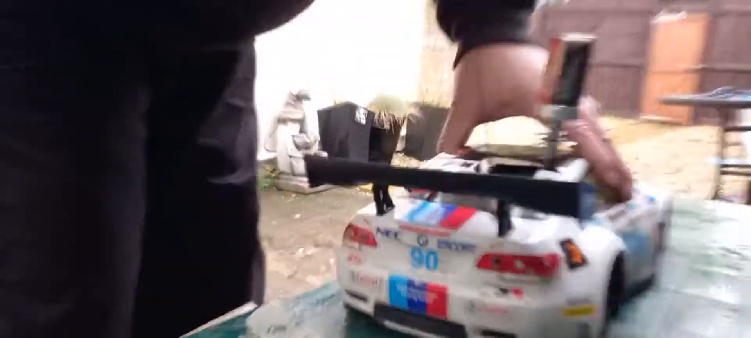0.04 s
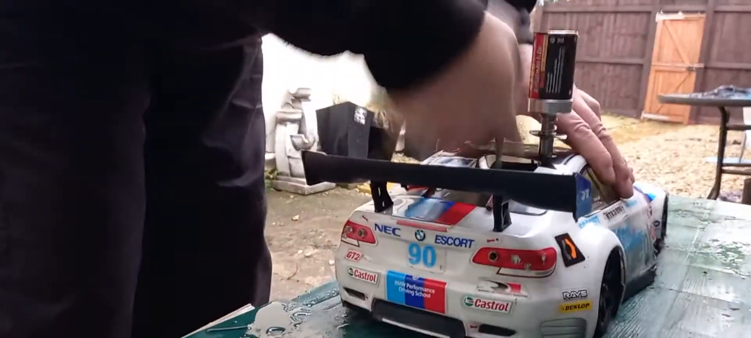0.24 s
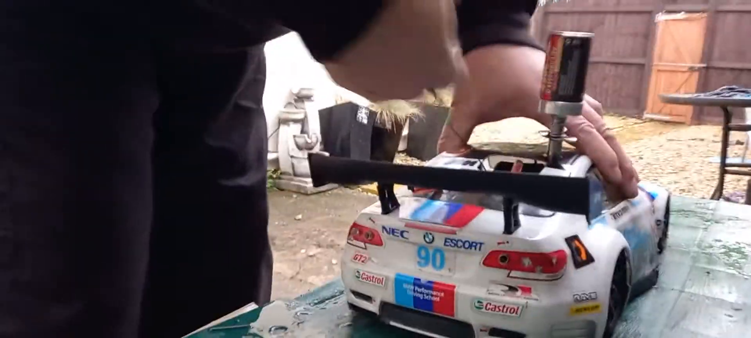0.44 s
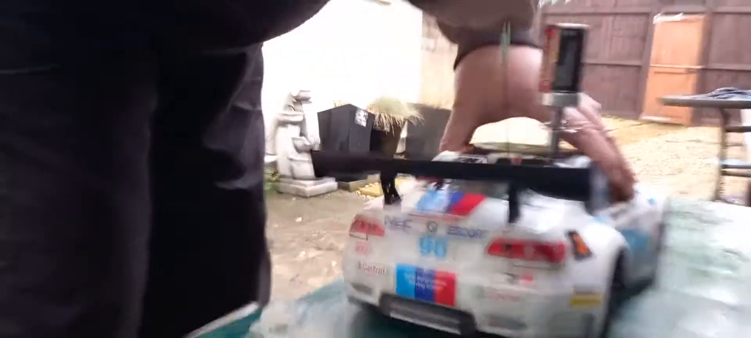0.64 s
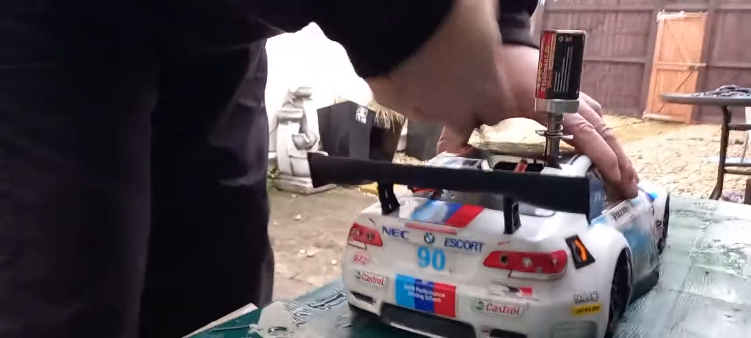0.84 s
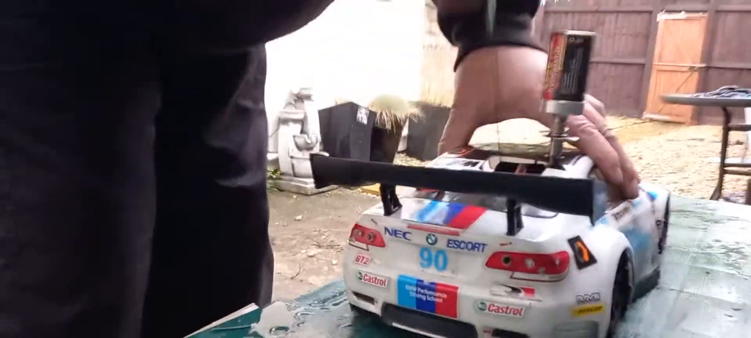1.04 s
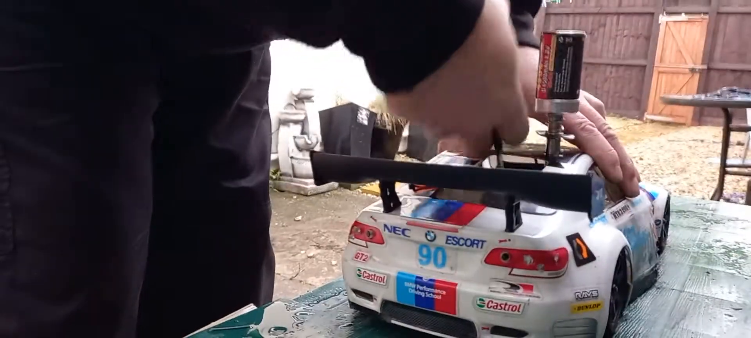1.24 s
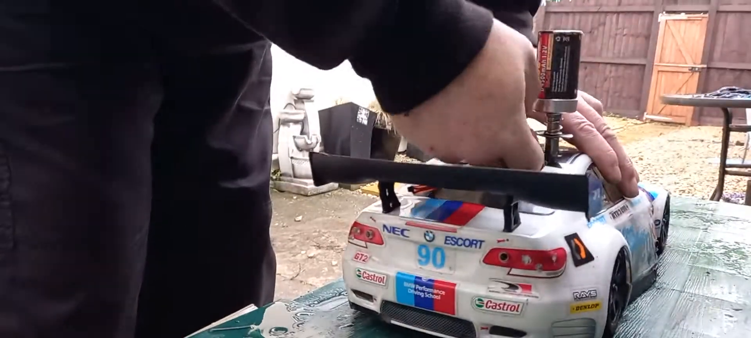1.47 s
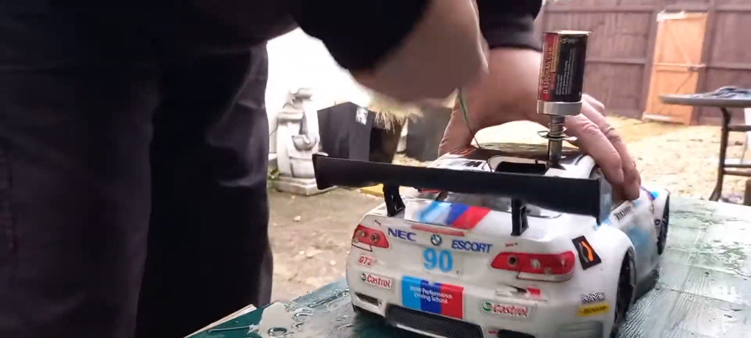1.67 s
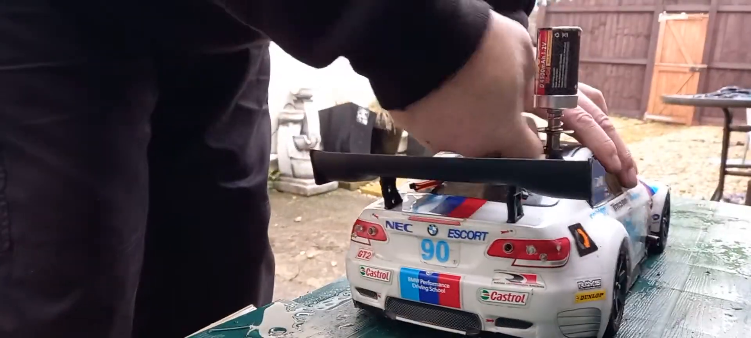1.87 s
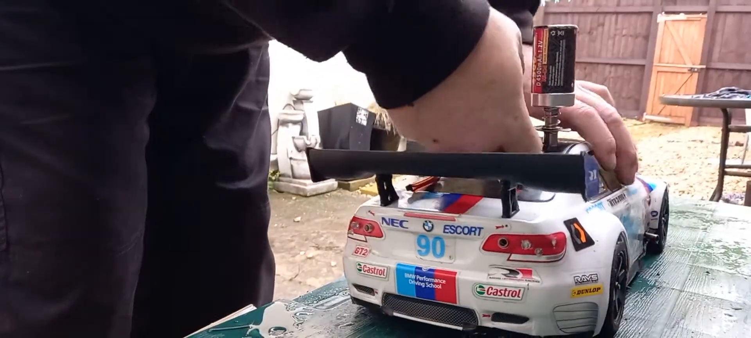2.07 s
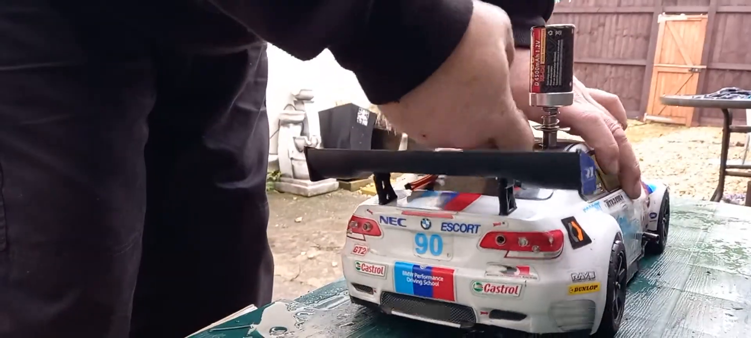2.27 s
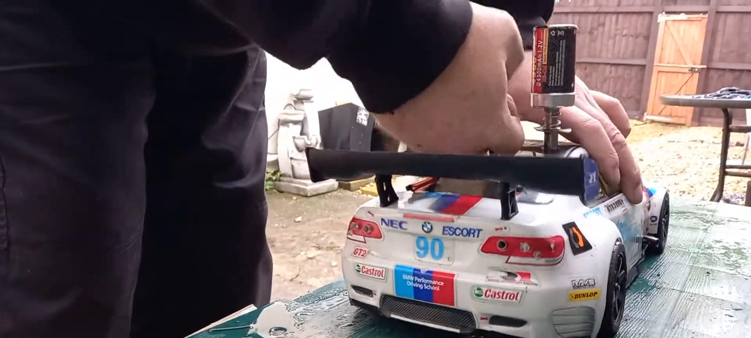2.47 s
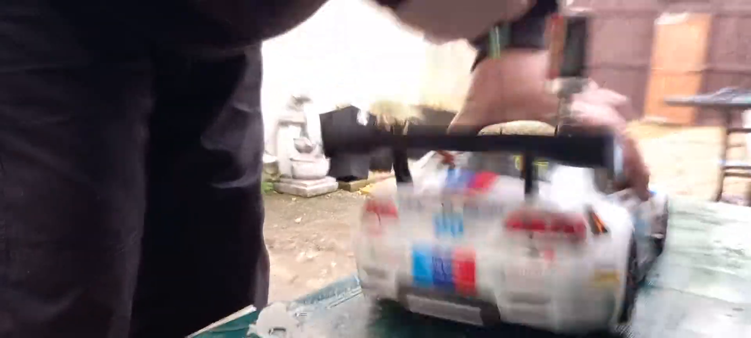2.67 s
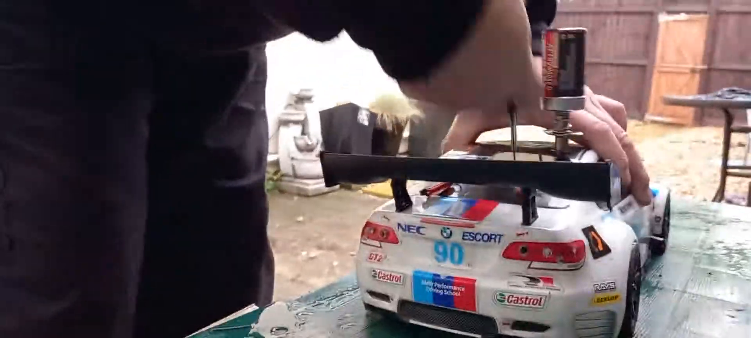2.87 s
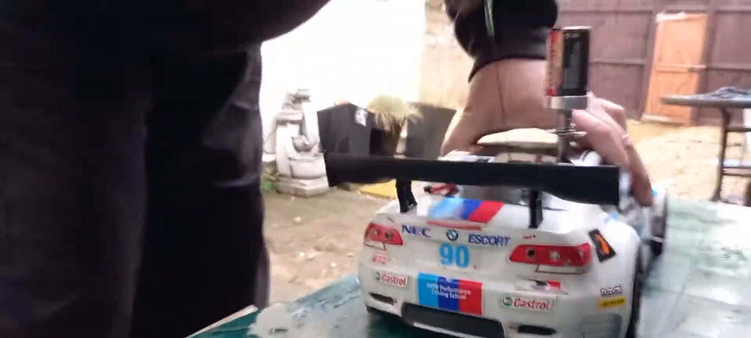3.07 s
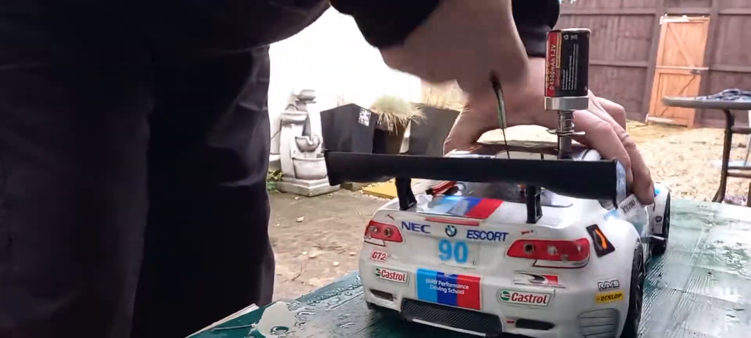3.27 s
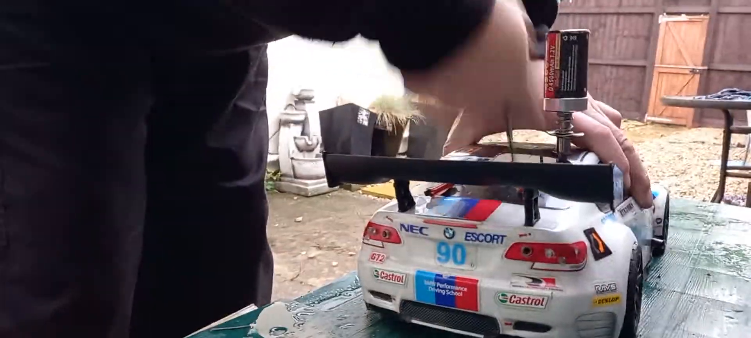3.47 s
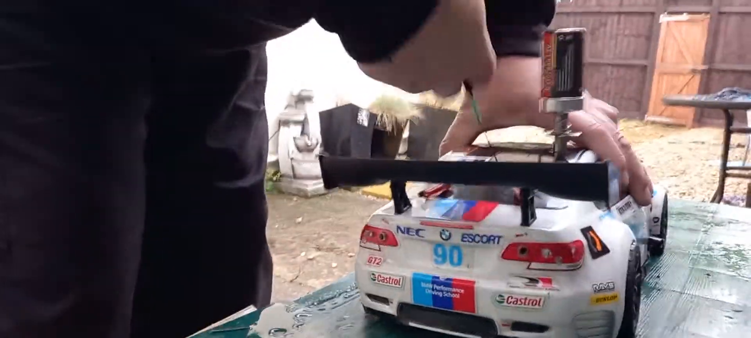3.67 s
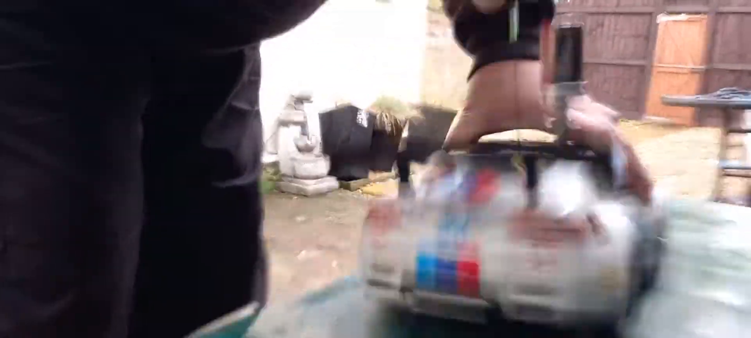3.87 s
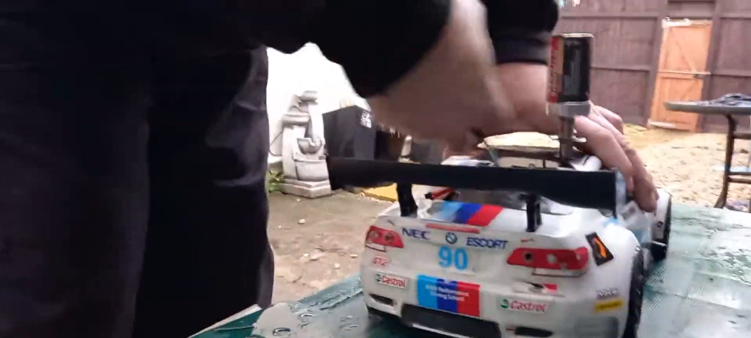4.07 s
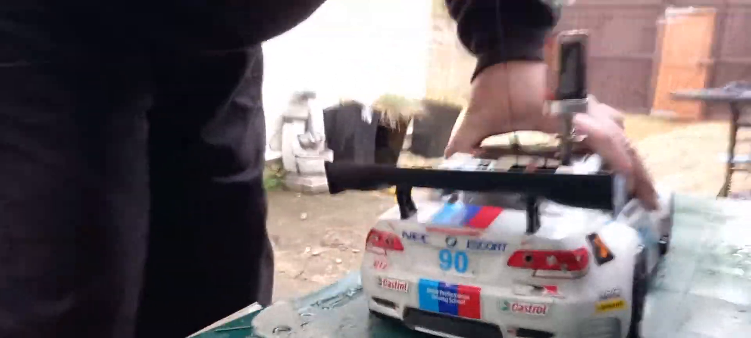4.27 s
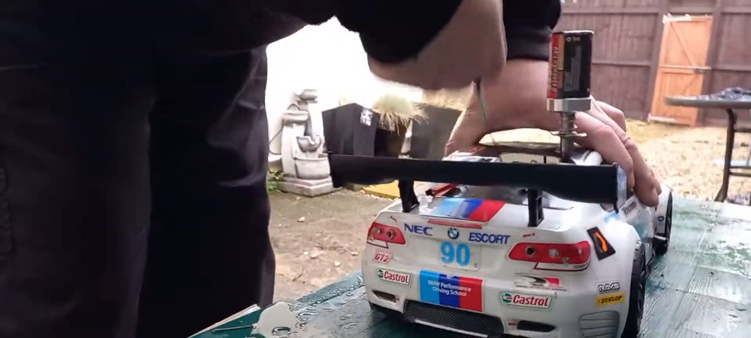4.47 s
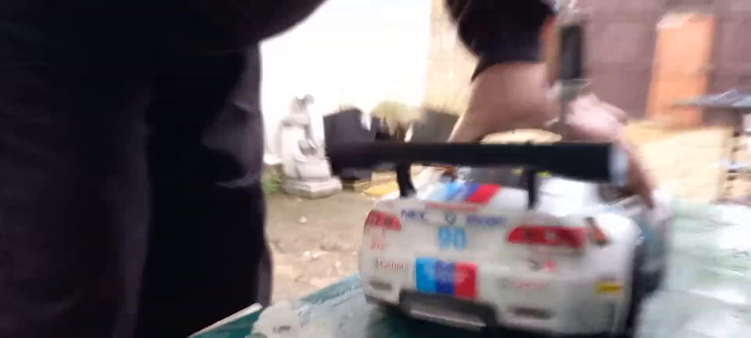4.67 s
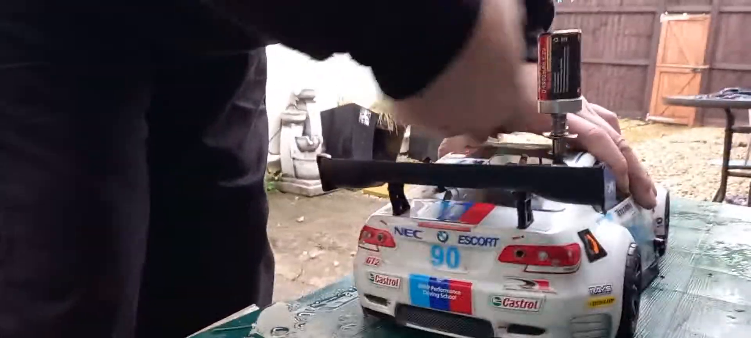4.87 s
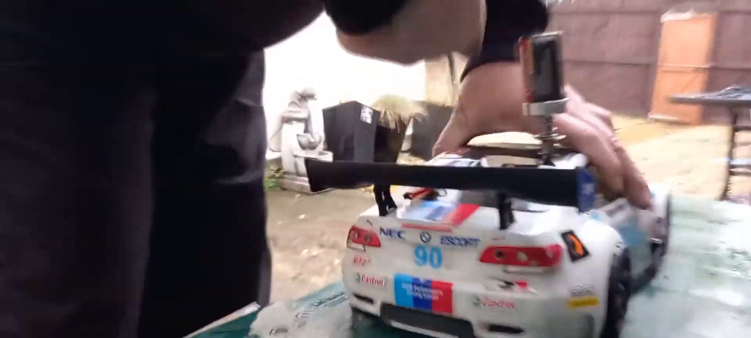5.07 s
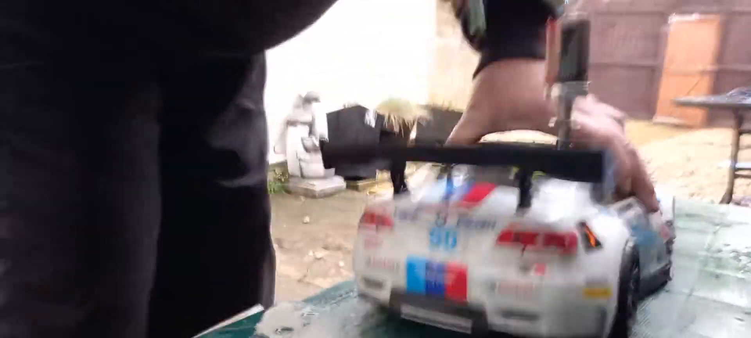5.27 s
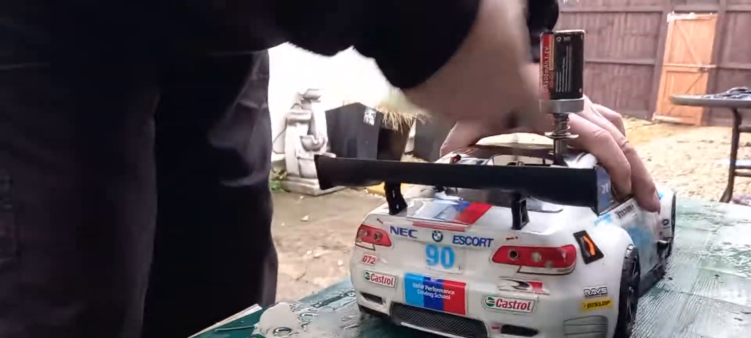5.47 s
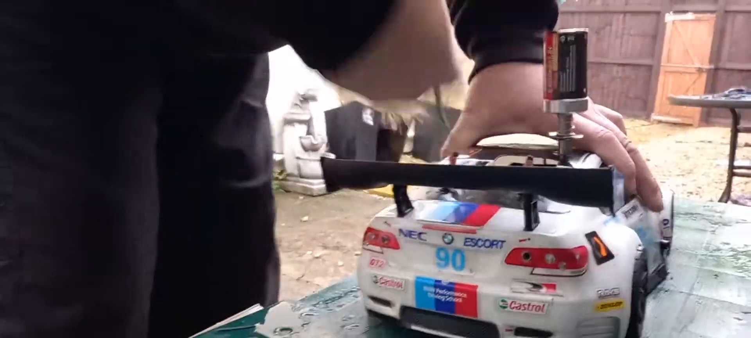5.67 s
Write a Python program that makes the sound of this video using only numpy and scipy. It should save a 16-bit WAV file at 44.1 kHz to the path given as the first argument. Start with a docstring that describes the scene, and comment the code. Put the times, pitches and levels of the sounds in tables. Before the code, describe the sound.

Repeated brisk cord pulls on a model car's little engine, each a rasp, metallic clack, thudding puffs and hollow tock, in a quiet yard.

```python
"""Starter of a model car's glow engine, close by: fourteen cord pulls, the first under way; it never runs.
Each pull snaps the cord taut and clacks the steel clutch (noise bursts, ringing modes); the piston thumps
(swinging tones), ports puff (pulsed noise), or the clutch skids and ratchets through chassis resonances.
The cord rasps out and rewinds with a sinking whirr (echoed noise); the handle tocks hollowly. Behind:
yard wash, rumble of hands, faint whine and short echoes."""
import sys
import numpy as np
from scipy import signal
from scipy.fft import irfft
from scipy.io import wavfile
from scipy.ndimage import uniform_filter1d

SR = 44100
rng = np.random.default_rng(int(sys.argv[2]) if len(sys.argv) > 2 else 0)


def wav_record(signal):
    """Record a signal, one row per channel, as 16-bit PCM in the file named by sys.argv[1]."""
    frames = np.transpose(np.atleast_2d(signal))
    bounded = np.clip(frames, -1, 1)
    # unit amplitude maps onto the largest positive 16-bit level
    quanta = np.round(bounded * 32767).astype(np.int16)
    wavfile.write(sys.argv[1], SR, quanta)


N = 251811
TIME = np.arange(N) / SR

# yard wash and rumble of hands on the car: start_s, wash_db, rumble_db
YARD_LEVELS = [(0.0, -51, -44), (1.0, -50, -40.5), (2.09, -52, -48), (2.949, -47.5, -43),
               (3.29, -58.5, -54.5), (3.91, -47, -43), (4.06, -53, -42.5), (4.59, -56.5, -41.5),
               (5.1, -49, -33), (5.55, -52, -45)]
# spectrum of distant wash: freq_hz, level_db
WASH_COLOUR = [(150, -27), (250, 6), (550, -6.5), (760, -3), (1100, -0.5), (1500, -4.5), (1900, -6),
               (3200, -17.5), (5600, -28.5), (8500, -26.5), (11000, -34), (14000, -21.5), (16000, -30.5)]
# spectrum of hand rumble: freq_hz, level_db
RUMBLE_COLOUR = [(15, -49.5), (28, -30.5), (48, -1), (80, -1), (130, -2.5), (175, -12.5), (240, -10),
                 (350, -25.5), (700, -66)]
# decay of the yard's echo: freq_hz, t60_s
ECHO_T60 = [(100, 0.7), (1000, 0.4348), (5000, 0.48), (9000, 0.46), (15000, 0.23)]
# spectrum of the yard's echo: freq_hz, level_db
ECHO_COLOUR = [(60, 4), (300, 1), (1000, 2), (4000, 1.5), (9000, 0), (15000, 1.5)]
# left-right correlation of noise: freq_hz, correlation
STEREO_LIKENESS = [(40, 0.91), (130, 0.97), (300, 0.74), (600, 0.77), (1200, 0.14), (16000, 0.042)]
# squeak while the cord is eased taut: start_s, pitch_hz, level_db
SQUEAK_PATH = [(2.3, 10000, -76.5), (2.385, 10400, -82), (2.4, 11100, -60), (2.56, 10700, -80.5)]
# spring winds the cord in: start_s, end_s, level_db
REWIND_SPANS = [(0.432, .5, -40), (.765, 0.844, -45.5), (1.652, 1.751, -39), (2.746, 2.796, -49),
                (4.016, 4.106, -46), (4.487, 4.56, -37.5), (4.793, 4.856, -37), (5.111, 5.137, -32),
                (5.367, 5.399, -36.5), (5.439, 5.463, -43.5), (5.642, 5.72, -36.5)]
# spectrum of cord rasp: freq_hz, level_db
WHIRR_COLOUR = [(300, -31), (620, -3.5), (830, 3.5), (1200, -9), (1550, -2), (2000, -8.5), (3200, -9),
                (6000, -19), (15000, -28)]
# tocks of handle and body shell: start_s, level_db
HANDLE_HITS = [(.376, -21.5), (.856, -16), (1.113, -24.5), (1.169, -35.5), (1.755, -18), (2.818, -34.5),
               (4.084, -22), (4.537, -11.5), (4.861, -28.5), (5.068, -24), (5.149, -25), (5.403, -25)]
# spectrum of handle tock: freq_hz, level_db
TOCK_COLOUR = [(150, -11), (350, -13), (550, -10), (780, 1), (950, 2), (1200, -12), (1500, -11),
               (1900, -12.5), (2500, -19), (4000, -23.5), (7000, -36), (15000, -48.5)]
# single dull chassis knocks: start_s, level_db, hollow_db (low part re knock)
KNOCK_HITS = [(.089, -30.5, 0), (0.223, -33, -1.5), (.374, -26.5, 2), (.745, -26.5, 5.5), (1.085, -34.5, 9),
              (2.927, -31.5, -6), (4.057, -30.5, -14), (5.066, -21.5, -1), (5.267, -18.5, -3),
              (5.581, -16.5, -10)]
# spectrum of dull knock: freq_hz, level_db
KNOCK_COLOUR = [(300, -13.5), (550, -2.5), (800, -4), (970, -3), (1200, -6), (1500, -13), (2200, -19),
                (3500, -23), (7000, -28), (15000, -52)]
# spectrum of hollow part: freq_hz, level_db
HOLLOW_COLOUR = [(45, -4.5), (130, 3.5), (240, -9.5), (370, -4), (520, -7.5), (700, -24), (1500, -39)]
# chassis resonances: freq_hz, width_hz, level_db
CHASSIS_MODES = [(967, 37, 17), (1418, 67, 15), (1825, 100, -0.5), (2740, 78, -12), (3306, 120, 1),
                 (3864, 87, -13), (4630, 51, -25), (5360, 97, -20.5)]
# single ticks of clutch rollers and cord guide: start_s, level_db, body_db (re treble)
TICK_HITS = [(.118, -30, -15), (.277, -29, 3), (.77, -34, -12), (1.216, -34, -12.5), (1.686, -29.5, -4),
             (2.744, -30, 1), (3.5015, -16.5, -12.5), (3.631, -27.5, -7), (3.843, -34, -19),
             (3.946, -19.5, 3), (4.022, -31.5, 2.5), (4.083, -48, 7.5), (4.3835, -25, -9),
             (4.613, -23, -5.5), (4.6435, -13, -9.5), (4.678, -16, -9), (4.7055, -20.5, 1),
             (4.776, -26.5, -24), (5.036, -20.5, 3.5), (5.098, -31, -17), (5.667, -30, -4)]
# spectrum of steel clack: freq_hz, level_db
CLACK_COLOUR = [(1180, -33), (2000, -2), (2400, -5), (3550, -4.5), (5210, -3), (6590, -9), (7570, -5),
                (8050, 0), (8330, 1), (9660, -3.5), (11900, -5), (13600, -4), (14700, -8), (15600, -12),
                (16000, -24)]
# spectrum of the clack's body: freq_hz, level_db
BODY_COLOUR = [(300, -7.5), (600, 0), (950, 0), (1200, -5.5), (1450, -4.5), (1900, 0), (2500, -8),
               (3500, -20.5), (8000, -60.5)]
# ringing modes of the steel: freq_hz, level_db, t60_s
STEEL_MODES = [(6848, -12, .65), (9168, 4, .14), (9690, 1, .15), (9986, -10, .25), (10290, -1, .2),
               (11610, -6, .16), (12990, -7, .36)]
# spectrum of port air: freq_hz, level_db
AIR_COLOUR = [(20, -18.5), (40, -1.5), (70, 11.5), (120, 0.5), (180, -4.5), (240, 0.5), (350, -3.5),
              (550, -9.5), (1000, -19), (2000, -29), (4000, -32.5), (15000, -58.5)]
# hard kicks of the piston against compression: start_s, level_db, pitch_hz
HARD_KICKS = [(0.033, -5.5, 115.6), (0.307, -11.5, 129), (.323, -8.5, 96.4), (.359, -11.5, 117),
              (.706, -12.5, 123), (2.648, -7, 127), (2.713, -4.5, 128.6), (2.7295, -11.5, 127.7),
              (2.99, -11.5, 118), (3.012, -13.5, 120.6), (3.979, -7.5, 108), (4.719, -10, 118),
              (5.046, -6.5, 123.5), (5.31, -9, 118.6), (5.609, -11.5, 115)]
# one row a pull: strike_s, clack_db, slip_s, spin_s, effort_db, steel_db, centre_hz (of ringing)
PULL_ROWS = [(-.03, -7, 0.067, 0.092, -24.5, -23, 11700), (.3006, -3, 0, 0.077, -24, -49, 9800),
             (0.6542, -7.5, 0, 0.072, -24.5, -38, 10000), (0.9426, -6.5, .063, 0.085, -27.5, -22.5, 12100),
             (1.57, -5, 0.00017, 0.065, -25, -4, 14040), (2.6443, -5.5, 0, 0.12, -25, -62, 10000),
             (2.9864, -2.5, .083, 0.11, -25, -23, 8400), (3.5351, -3, 0, 0.052, -27.5, -20.5, 11400),
             (3.879, -4, 0.0011, 0.14, -27, -57, 9900), (4.243, -4.5, .0666, 0.1, -25, -23, 11200),
             (4.654, -4.5, 0.00087, 0.066, -25, -27, 9800), (4.9558, -4, 0, 0.13, -25, -52, 10000),
             (5.239, -4.5, 0.0022, 0.094, -24.5, -47.5, 9900), (5.5593, -5, 0.00059, 0.1, -23.5, -32, 9900)]

EDGE_HZ = 15900
WHINE_HZ, WHINE_DB = 14600, -76.5
RISE_S = .0006  # steel clack
TAUT_S = .0145  # cord snaps taut this long before the strike
COAST_DB_PER_S = 428  # fade once the pull ends


def amp(db):
    """Decibels to gain."""
    return 10 ** (np.asarray(db) / 20)


def unit(x):
    """Scales to rms 1."""
    return x / np.sqrt(np.mean(x ** 2) + 1e-20)


def drift(width):
    """Slow random wander of rms 1: white noise averaged over width samples."""
    return unit(uniform_filter1d(rng.standard_normal(N), size=width))


def read(points, hz):
    """Reads a table on a log-frequency axis."""
    f, value = np.transpose(points)
    return np.interp(np.log(hz + 1), np.log(f + 1), value)


def add(mix, s, sound):
    """Adds a stereo sound at time s, which may lie before the start."""
    at = round(s * SR)
    sound = sound[:, max(-at, 0):]
    part = mix[:, max(at, 0):][:, :sound.shape[1]]
    part += sound[:, :part.shape[1]]


def level(tables):
    """Smoothed gain summed over tables of (s, dB), each at -120 dB outside its span."""
    gain = sum(amp(np.interp(TIME, *np.transpose(rows), left=-120, right=-120)) for rows in tables)
    return uniform_filter1d(gain, size=300)


def noise(colour, size=N):
    """Coloured stereo noise, its bass nearly alike in both channels."""
    hz = np.fft.rfftfreq(size, 1 / SR)
    a, b = np.exp(2j * np.pi * rng.random((2, len(hz))))
    same = np.clip(read(STEREO_LIKENESS, hz), -1, 1)
    right = same * a + np.sqrt(1 - same ** 2) * b
    return unit(irfft(np.array([a, right]) * amp(read(colour, hz)), size))


def burst(colour, rise_s, hold_s, t60_s):
    """A blow on densely ringing parts: noise that rises, holds briefly and dies."""
    t = TIME[:4096]
    decay = amp(-60 * np.maximum(t - hold_s, 0) / t60_s)
    return noise(colour, size=len(t)) * np.minimum(t / rise_s, 1) * decay


def turning(first_s, gap_s, jitter, gain_db, spread_db, count):
    """Rows (s, dB) of blows recurring unevenly in each pull, scaled by effort, fading as the crank coasts."""
    rows = []
    for s, _, _, spin_s, effort_db, _, _ in PULL_ROWS:
        early, strong = rng.standard_normal((2, count))
        after_s = first_s + gap_s * (np.arange(count) + jitter * early)
        coast_db = COAST_DB_PER_S * np.maximum(after_s - spin_s, 0)
        rows += zip(s + after_s, effort_db + gain_db + spread_db * strong - coast_db)
    return rows


def background(sway_db=1.0, waver_hz=30):
    """Distant outdoor wash, swaying rumble of hands on the car and a faint high whine."""
    s, wash_db, rumble_db = np.transpose(YARD_LEVELS)
    wash = amp(np.interp(TIME, s, wash_db)) * noise(WASH_COLOUR)
    rumble = amp(np.interp(TIME, s, rumble_db) + sway_db * drift(3000)) * noise(RUMBLE_COLOUR)
    pitch_hz = WHINE_HZ + waver_hz * drift(200)
    whine = amp(WHINE_DB) * np.sqrt(2) * np.sin(2 * np.pi * np.cumsum(pitch_hz) / SR)
    return wash + rumble + whine


def yard(x, near_db=-14, near_t60_s=0.12, far_db=-19):
    """Quick reflections from table and body, then a weak tail from walls and fences."""
    hz, t, z = signal.stft(noise(ECHO_COLOUR, size=SR // 2), SR, nperseg=256)
    decay = amp(-60 * t / read(ECHO_T60, hz)[:, None])
    far = signal.istft(z * decay, SR, nperseg=256)[1]
    t = TIME[:far.shape[1]]
    near = noise(ECHO_COLOUR, size=len(t)) * amp(-60 * t / near_t60_s) * (t > .003)
    far = far * np.minimum(t / 0.0073, 1)
    echo = amp(near_db) * near / np.linalg.norm(near[0]) + amp(far_db) * far / np.linalg.norm(far[0])
    return signal.oaconvolve(x, echo, axes=1)[:, :N]


def fiddling(per_s=11, top_db=-58, spread_db=1.5, t60_s=.025):
    """Hands shifting on the car make tiny ticks at random."""
    clicks = (rng.random(N) < per_s / SR) * amp(top_db + spread_db * rng.standard_normal(N))
    return signal.oaconvolve(clicks[None], burst(CLACK_COLOUR, RISE_S, RISE_S, t60_s), axes=1)[:, :N]


def squeak(waver_hz=70):
    """A thin, unsteady friction tone."""
    s, hz, db = np.transpose(SQUEAK_PATH)
    pitch_hz = np.interp(TIME, s, hz) + waver_hz * drift(100)
    return level([np.transpose([s, db])]) * np.sin(2 * np.pi * np.cumsum(pitch_hz) / SR)


def rewinds(gain_db=-1, grain_db=1.5, echo=0.5, swell_db=4, start_hz=1280, end_hz=880):
    """Braided cord rasps back through its guide; waves echoing along it give a sinking pitch."""
    grain = unit(amp(grain_db * drift(80)))
    rasp, out = grain * noise(WHIRR_COLOUR), np.zeros((2, N))
    for start_s, end_s, db in REWIND_SPANS:
        t = np.arange(start_s, end_s, 1 / SR)
        period_s = np.linspace(1 / start_hz, 1 / end_hz, len(t))
        sung = np.array([sum(echo ** k * np.interp(t - k * period_s, TIME, side) for k in range(4))
                         for side in rasp])
        gain = amp(db + gain_db + swell_db * np.linspace(-.5, .5, len(t)))
        add(out, start_s, gain * unit(sung) * signal.windows.tukey(len(t), .25))
    return out


def draws(top_db=-43, lead_s=0.052, swell_db=18, rasp_db=1):
    """Slack cord hisses and rasps out through its guide, swelling until the clutch strikes."""
    gain = level([[(s - lead_s, top_db - swell_db), (s, top_db)] for s, *_ in PULL_ROWS])
    return gain * (noise(CLACK_COLOUR) + amp(rasp_db) * noise(KNOCK_COLOUR))


def handle(gain_db=-3.5, rise_s=0.0008, hold_s=0.001, t60_s=0.035, cross=0.23, crack_db=-16, hardening=2.2):
    """Handle and shell give much the same hollow tock at each meeting; hard ones crack brighter."""
    out = np.zeros((2, N))
    usual = burst(TOCK_COLOUR, rise_s, hold_s, t60_s)
    hardest_db = max(db for _, db in HANDLE_HITS)
    for s, db in HANDLE_HITS:
        tock = amp(db + gain_db) * (usual + burst(TOCK_COLOUR, rise_s, hold_s, t60_s)) / np.sqrt(2)
        # crack level grows faster than the tock's
        crack_gain = amp(hardest_db + crack_db + hardening * (db - hardest_db))
        add(out, s, tock + crack_gain * burst(BODY_COLOUR, rise_s, hold_s, t60_s))
    return out + cross * out[::-1]


def knocks(gain_db=-2, hollow_gain_db=-3, t60_s=0.051, hollow_t60_s=0.034, tug_db=1.5, tug_hollow_db=3.5,
           play_hollow_db=8, rise_s=0.0035, hold_s=0.0034):
    """Dull knocks over the shell's hollow: cord snaps taut, then loose parts jostle as the crank turns."""
    tugs = [(s - TAUT_S, effort_db + tug_db, tug_hollow_db) for s, _, _, _, effort_db, _, _ in PULL_ROWS]
    jostles = turning(first_s=.049, gap_s=.035, jitter=.15, gain_db=-6, spread_db=-1.5, count=2)
    play = [(s, db, play_hollow_db) for s, db in jostles]
    out = np.zeros((2, N))
    for s, db, hollow_db in KNOCK_HITS + tugs + play:
        knock = amp(gain_db) * burst(KNOCK_COLOUR, rise_s, hold_s, t60_s)
        hollow = amp(hollow_db + hollow_gain_db) * burst(HOLLOW_COLOUR, rise_s, 0.0066, hollow_t60_s)
        add(out, s, amp(db) * (knock + hollow))
    return out


def churn(gain_db=-1.0, strokes_hz=66, puff=0.19, coast_s=0.039):
    """Ports puff air on each uneven turn of the crank, which then coasts to rest."""
    gain = level([[(s - TAUT_S, effort_db), (s + spin_s, effort_db),
                   (s + spin_s + coast_s, effort_db - COAST_DB_PER_S * coast_s)]
                  for s, _, _, spin_s, effort_db, _, _ in PULL_ROWS])
    turns = np.cumsum(strokes_hz * (1 + .2 * drift(2000))) / SR
    puffs = uniform_filter1d(0.14 + np.exp(-(turns % 1) / puff), size=80)
    return amp(gain_db) * gain * noise(AIR_COLOUR) * unit(puffs)


def strokes(stroke_hz=114, scatter=.12, apart_s=.015):
    """Rows (s, dB, Hz) of piston strokes: hard kicks, and softer strokes clear of them as the crank spins."""
    soft = turning(first_s=0.00502, gap_s=.024, jitter=.12, gain_db=5.5, spread_db=4.0, count=5)
    pitch_hz = stroke_hz * np.exp(scatter * rng.standard_normal(len(soft)))
    rows = list(HARD_KICKS)
    for (s, db), hz in zip(soft, pitch_hz):
        if all(abs(s - kick[0]) > apart_s for kick in HARD_KICKS):
            rows.append((s, db, hz))
    return rows


def thumps(table_hz=112, table_db=-20, table_t60_s=0.26, skew_turns=0.048, octave_db=-12, push_db=-13):
    """Each stroke shoves the car and swings it to and fro a few times, leaving the table booming."""
    out, t = np.zeros((2, N)), TIME[:SR // 4]
    swell_s = .008
    shape = (t / swell_s * np.exp(1 - t / swell_s)) ** 2
    for s, db, hz in strokes():
        turn = 2 * np.pi * (hz * t)
        # left and right differ slightly in phase
        turn = turn + 2 * np.pi * skew_turns * rng.standard_normal() * np.array([[-.5], [.5]])
        # tyres stiffen at the top of the swing and add an octave; the shove is slower
        octave = amp(octave_db) * shape * np.cos(2 * turn)
        shove = amp(push_db) * np.sin(turn / 2)
        swing = shape * (np.sin(turn) + octave + shove)
        boom_gain = amp(table_db - 60 * t / table_t60_s) * np.minimum(t / swell_s, 1)
        boom = boom_gain * np.sin(2 * np.pi * (table_hz * t + rng.random()))
        add(out, s, amp(db) * (swing + boom))
    return out


def chassis(x):
    """Rings the chassis resonances, each with another phase on each side."""
    t = TIME[:4096]
    ring = np.zeros((2, len(t)))
    for hz, width_hz, db in CHASSIS_MODES:
        tone = np.sin(2 * np.pi * (hz * t + rng.random((2, 1))))
        ring += amp(db) * width_hz * np.exp(-np.pi * width_hz * t) * tone
    return signal.oaconvolve(x, ring / np.linalg.norm(ring[0]), axes=1)[:, :N]


def skids(gain_db=-5, hiss_db=-11, teeth_hz=105, bite=0.45):
    """The slipping clutch sticks and lets go in uneven jerks, which set the chassis ringing."""
    turns = np.cumsum(teeth_hz * (1 + 0.3 * drift(600))) / SR
    slipping = level([[(s, effort_db), (s + slip_s, effort_db)]
                      for s, _, slip_s, _, effort_db, _, _ in PULL_ROWS if slip_s > TAUT_S])
    jerks = unit(0.14 + np.exp(-(turns % 1) / bite))
    gain = amp(gain_db) * slipping * jerks
    return chassis(gain * rng.standard_normal((2, N))) + amp(hiss_db) * gain * noise(CLACK_COLOUR)


def steel(reach_hz=1100, beat_hz=22, twin=0.39):
    """Thin ringing at the grip; the struck spot favours nearby modes, each beating with a close twin."""
    out, t = np.zeros((2, N)), TIME[:SR // 2]
    for s, _, slip_s, _, _, db, centre_hz in PULL_ROWS:
        for hz, mode_db, t60_s in STEEL_MODES:
            favour = 1 / (1 + ((hz - centre_hz) / reach_hz) ** 2)
            phase = rng.random() + np.array([[0], [1 / 5]])
            main = np.sin(2 * np.pi * (hz * t + phase))
            second = twin * np.sin(2 * np.pi * ((hz + beat_hz) * t + rng.random((2, 1))))
            add(out, s + slip_s, favour * amp(db + mode_db - 60 * t / t60_s) * (main + second))
    return out


def clacks(rows, gain_db, body_gain_db, hold_s, t60_s, body_t60_s):
    """Steel hits steel; the same parts sound each time, so the hits are partly alike."""
    out = np.zeros((2, N))
    usual = burst(CLACK_COLOUR, RISE_S, hold_s, t60_s)
    for s, db, body_db in rows:
        crack = 0.53 * usual + 0.74 * burst(CLACK_COLOUR, RISE_S, hold_s, t60_s)
        body = amp(body_db + body_gain_db) * burst(BODY_COLOUR, RISE_S, hold_s, body_t60_s)
        add(out, s, amp(db) * (amp(gain_db) * crack + body))
    return out


def ticks(tooth_s=.0095, jitter=0.091, tooth_db=12, fade_db=1.1, spread_db=4.5, tooth_body_db=-2.5,
          rebound_s=.017, rebound_db=-22, rebound_body_db=-2):
    """Small steel ticks: single ones, a rebound after each grip, fading runs of teeth during slips."""
    rebounds = [(s + slip_s + rebound_s, db + rebound_db, rebound_body_db)
                for s, db, slip_s, *_ in PULL_ROWS]
    rows = TICK_HITS + rebounds
    for s, _, slip_s, _, effort_db, _, _ in PULL_ROWS:
        for k, (early, strong) in enumerate(rng.standard_normal(size=(8, 2)), 1):
            if (k + 1) * tooth_s < slip_s:
                db = effort_db + tooth_db - fade_db * k + spread_db * strong
                rows.append((s + tooth_s * (k + jitter * early), db, tooth_body_db))
    return clacks(rows, gain_db=-4.0, body_gain_db=-6.5, hold_s=0.00094, t60_s=0.048, body_t60_s=0.035)


def bites(body_db=-13, glancing_db=-7):
    """The clutch clacks as it strikes; if it slips, that blow is thinner and a second marks the grip."""
    rows = [(s + slip_s, db, body_db) for s, db, slip_s, *_ in PULL_ROWS]
    rows += [(s, db, body_db + glancing_db) for s, db, slip_s, *_ in PULL_ROWS if slip_s > TAUT_S]
    return clacks(rows, gain_db=-7.0, body_gain_db=-6.5, hold_s=0.0035, t60_s=0.025, body_t60_s=0.066)


def scene():
    """Starter, engine and yard together."""
    heavy, light = bites(), ticks()
    ringing = chassis(amp(-13) * heavy + amp(-8) * light)
    clutch = heavy + light + ringing + steel() + skids() + draws()
    clutch = clutch * amp([[-.8], [.8]])  # slightly right
    car = clutch + knocks() + handle() + churn() + rewinds() + squeak() + fiddling() + thumps()
    return car + yard(car) + background()


def record(dry, low_hz=34):
    """Bass roll-off, soft overload on the loudest peaks, and a treble band limit."""
    dry = signal.sosfilt(signal.butter(3, low_hz, "highpass", fs=SR, output="sos"), dry)
    dry = dry / (1 + (dry / .93) ** 8) ** (1 / 8)
    lowpass = signal.firwin(255, EDGE_HZ, window=("kaiser", 9), fs=SR)
    return signal.oaconvolve(dry, lowpass[None], "same")


dry = scene()
out = record(dry)
wav_record(out)
```